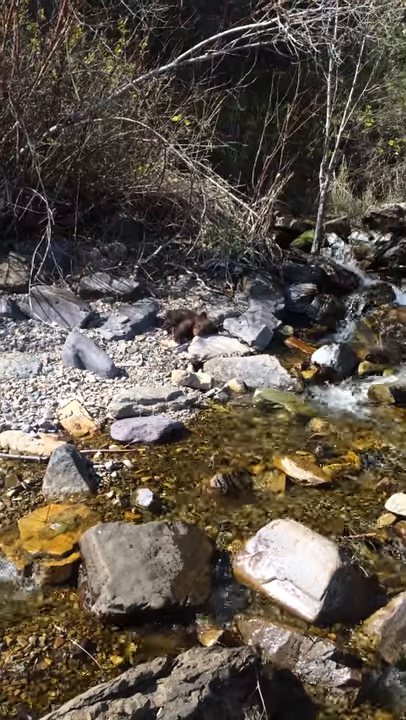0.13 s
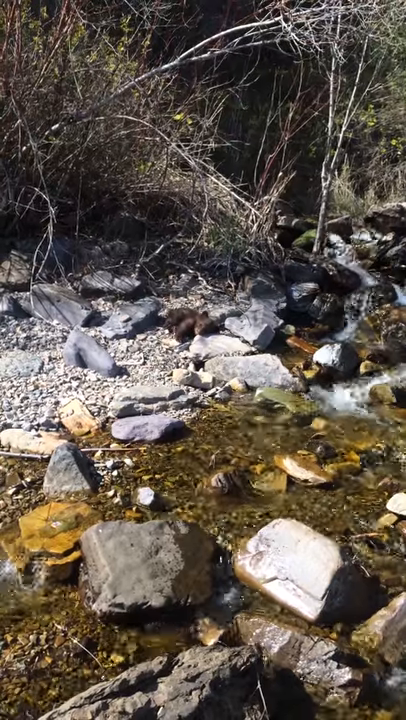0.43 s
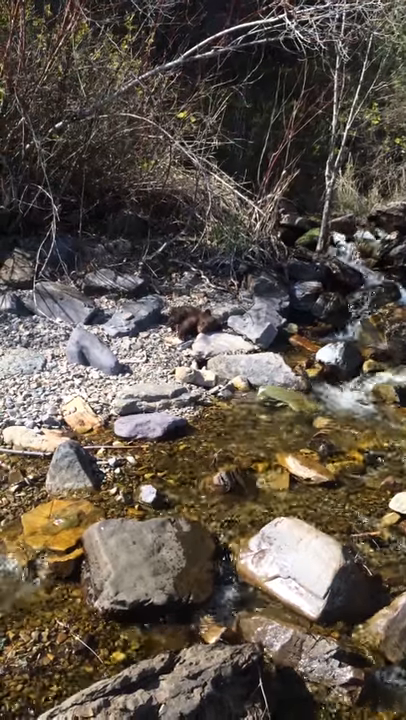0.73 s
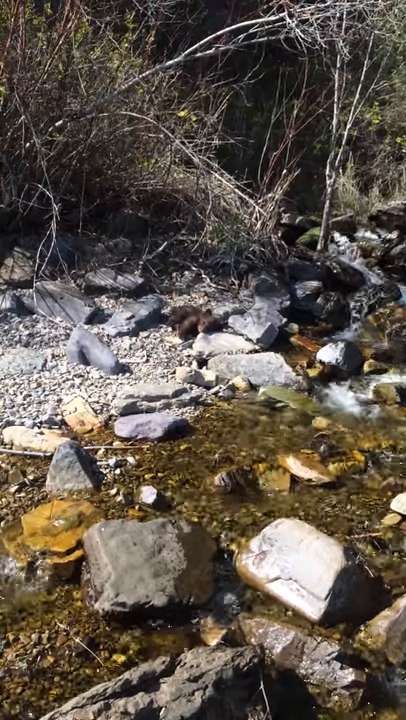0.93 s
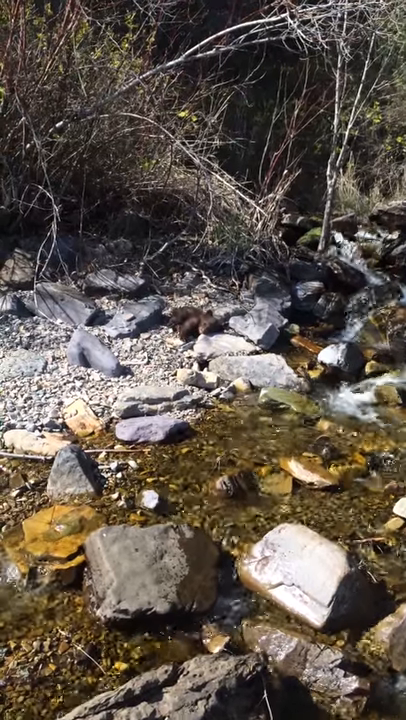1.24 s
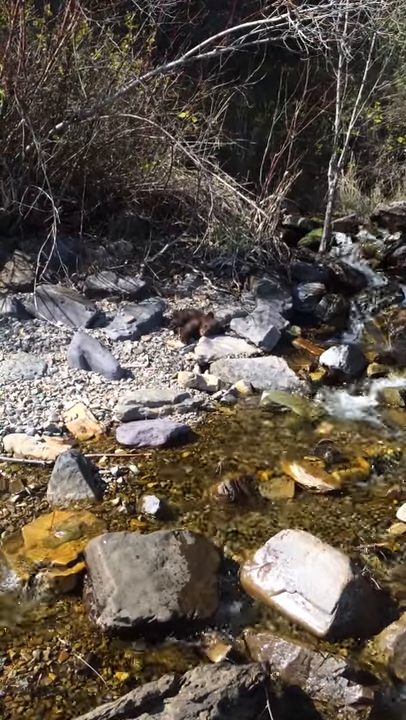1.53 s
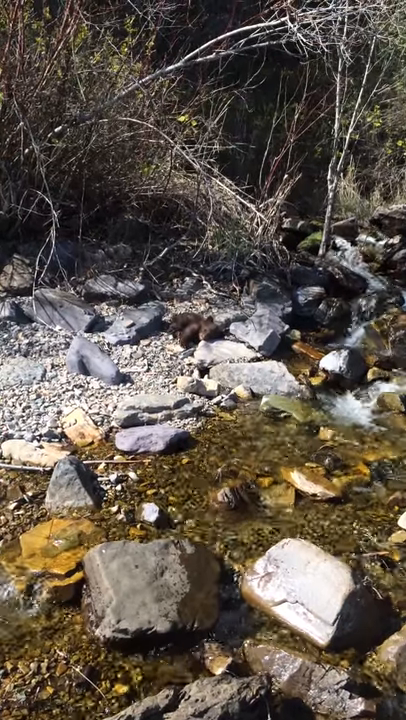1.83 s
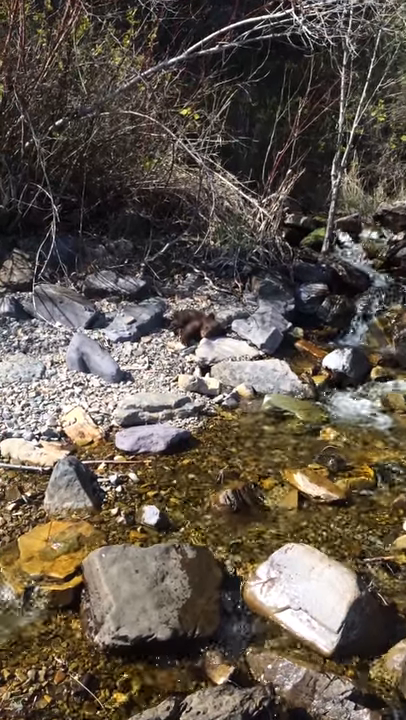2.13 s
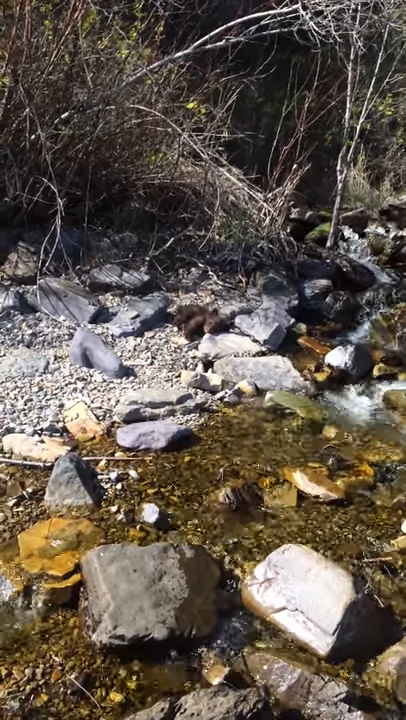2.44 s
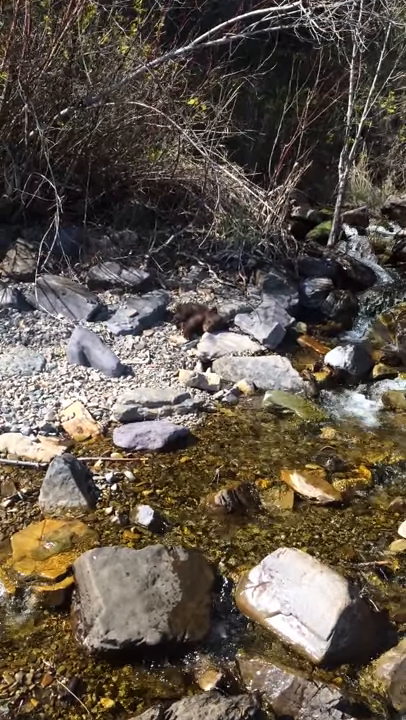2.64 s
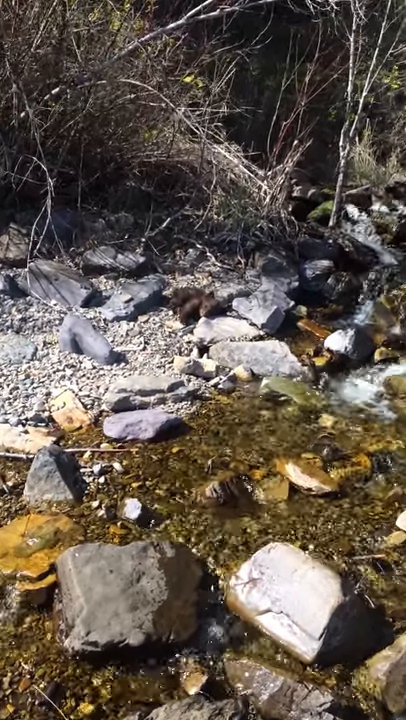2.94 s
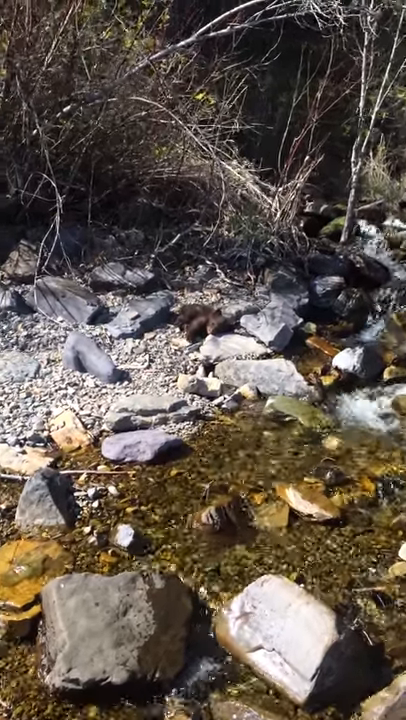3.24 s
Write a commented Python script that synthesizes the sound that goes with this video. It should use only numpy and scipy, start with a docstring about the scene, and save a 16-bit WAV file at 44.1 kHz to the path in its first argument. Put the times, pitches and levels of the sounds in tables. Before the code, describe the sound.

Water runs over stones in a shallow creek, an even wash with fine spray and low gulps. One sharp droplet ticks early, fainter ticks and plinks follow, and soft puffs of wind brush the microphone.

```python
"""After 0.12 s of silence a shallow stream rushes steadily over rocks: countless bubbles merge into a wash,
nearer ones ring singly and fine spray crackles. Throughout, air pockets gurgle and gulp under a small fall.
From 0.6 s on, close bubbles plink and droplets tick, the sharpest at 0.7 s; the loudest gulp comes at 1.6 s.
A light breeze rumbles on the microphone in puffs, strongest near 2.3 s and at the end."""
import sys
import numpy as np
from scipy import signal
from scipy.fft import rfft, irfft, next_fast_len
from scipy.io import wavfile
from scipy.ndimage import uniform_filter1d, map_coordinates

SR = 44100
rng = np.random.default_rng(int(sys.argv[2]) if len(sys.argv) > 2 else 0)


def inscribe(sig):
    """Save sig as 16-bit PCM at rate SR to the path in sys.argv[1].

    A 1-D sig is mono; a 2-D sig holds one channel per row.
    Samples are clipped to [-1, 1] before scaling.
    """
    pcm = np.round(np.clip(np.atleast_2d(sig).T, -1, 1) * 32767)
    wavfile.write(sys.argv[1], SR, pcm.astype(np.int16))


N = 148617

# envelope of the wind on the microphone: t/s, relative level/dB
BREEZE_ENVELOPE = [(0.13, -54), (0.22, -77), (0.42, -50.5), (0.52, -70), (0.78, -50), (1.12, -67.5),
                   (1.76, -55), (1.86, -44.5), (2.13, -58), (2.22, -39.5), (2.35, -39), (2.45, -59),
                   (2.51, -44), (2.67, -67), (3.0, -47), (3.04, -57), (3.1, -44.5), (3.37, -38)]
# spectrum of the wind rumble: f/Hz, relative level/dB
BREEZE_SPECTRUM = [(15, -26), (30, -20), (48, -4), (61, -2.5), (72, -0.5), (85, -7.5), (100, -1.5),
                   (130, -14), (200, -34), (400, -66)]
# loudest air pockets in the pool: t/s, peak level/dB, f/Hz
GULPS = [(0.268, -32, 190), (0.816, -35, 172), (1.613, -29.5, 177), (1.734, -36, 188), (2.701, -35, 177),
         (2.785, -38, 174)]
# filter on the spray: f/Hz, relative level/dB
SPRAY_COLOUR = [(1500, 3), (3400, -7.5), (4300, -0.5), (6000, -8.5), (9000, -16.5), (15000, -28)]
# near droplets: t/s, peak level/dB, f/Hz
DROPLETS = [(0.682, -15, 1800), (.9248, -43, 9000), (1.4573, -33, 6300), (1.4573, -28, 2690),
            (1.7878, -37, 9800), (1.9711, -47, 8300), (2.8848, -46, 8800), (3.0064, -42, 8000),
            (3.0962, -31, 5000), (3.1363, -46, 8500), (3.2338, -40, 8200), (3.2642, -47, 8800),
            (3.2687, -32, 4930)]
# single close bubbles: t/s, peak level/dB, f/Hz
PLINKS = [(.617, -30, 3430), (.635, -33, 1400), (.640, -28.5, 2230), (.676, -33, 1880), (.941, -26.5, 3510),
          (1.163, -31, 1880), (1.399, -30, 1450), (1.592, -28, 2270), (1.716, -30.5, 3430),
          (2.319, -30, 3340), (3.263, -29, 3040)]
# filter on the bubble swarm: f/Hz, relative level/dB
BUBBLE_COLOUR = [(200, -10.5), (400, -9), (720, -0.5), (1020, -1.5), (1480, 0.5), (1760, -4.5), (1950, 2.5),
                 (2300, 6), (2620, 4.5), (3100, 0), (3500, 4.5), (4100, -8), (5000, -24)]
# spectrum of the white water: f/Hz, relative level/dB
WASH_SPECTRUM = [(60, -42), (110, -11), (200, -2), (262, -3.5), (480, -4), (720, -3.5), (1000, -1.5),
                 (1490, 0.5), (1780, -1.5), (1930, 1), (2300, -3.5), (2600, 0.5), (2950, -2.5), (3410, -5),
                 (4390, -15.5), (7000, -27.5), (10000, -37), (15000, -43.5)]

GURGLE_DB, SPRAY_DB, BUBBLE_DB, WASH_DB = -46, -45, -34, -32  # rms levels at mean flow


def amp(db):
    """Amplitude grows tenfold for every 20 dB."""
    return 10 ** (np.asarray(db) / 20)


def unit(x):
    """Normalisation to rms 1."""
    return x / np.sqrt(np.mean(x ** 2) + 1e-20)


def wobble(per_s):
    """Spline interpolation joins random knots into a smooth curve."""
    return map_coordinates(rng.standard_normal(1024), [np.arange(N) * per_s / SR], mode="wrap")


def filtered(x, response):
    """Linear filtering multiplies the spectrum by a frequency response."""
    size = next_fast_len(N + SR // 2)
    return irfft(rfft(x, size) * response(np.fft.rfftfreq(size, 1 / SR)), size)[:N]


def coloured(x, points):
    """Spectral shaping by (f/Hz, level/dB) points on a log frequency axis, at rms 1."""
    f, db = np.transpose(points)
    return unit(filtered(x, lambda hz: amp(np.interp(np.log(hz + 1), np.log(f + 1), db))))


def rings(onset_s, db, hz, cycles, swell, rise):
    """Damped oscillators decay 60 dB over a life of `cycles`; swell is a share of life, rise of pitch."""
    life_s = (cycles / hz)[:, None]
    t = np.arange(min(int(life_s.max() * SR), SR // 4)) / SR
    age = t / life_s
    envelope = (1 - np.exp(-(age / swell) ** 2)) * np.exp(-np.log(1000) * age)
    envelope /= envelope.max(axis=1, keepdims=True)
    phase = 2 * np.pi * hz[:, None] * t * (1 + rise * age / 2)
    waves = amp(db)[:, None] * envelope * np.sin(phase)
    samples = (onset_s * SR).astype(int)[:, None] + np.arange(len(t))
    return np.bincount(samples.ravel(), waves.ravel(), N)[:N]


def swarm(per_s, low_hz, high_hz, cycles, swell, rise, spread_db, groups):
    """Superposition of bubbles of random onset, pitch, strength and damping, at rms 1."""
    when, pitch, strength, duration = rng.random((2 ** 15, 4))[:int(per_s * N / SR)].T
    hz = (np.sqrt(low_hz) + pitch * (np.sqrt(high_hz) - np.sqrt(low_hz))) ** 2
    db = -spread_db * np.log(strength + np.exp(-6))  # many weak, few strong
    life = cycles * 2 ** (duration - 0.5)
    like_pitched = np.array_split(np.argsort(hz), groups)
    return unit(sum(rings(when[g] * N / SR, db[g], hz[g], life[g], swell, rise) for g in like_pitched))


def breeze(gain_db=1):
    """Turbulent pressure on the microphone rumbles with each puff of air."""
    level_db = np.interp(np.arange(N) / SR, *np.transpose(BREEZE_ENVELOPE))
    return amp(level_db + gain_db) * coloured(rng.standard_normal(N), BREEZE_SPECTRUM)


def pool():
    """Resonant frequency falls with size: large air pockets under the fall gurgle and gulp low."""
    gurgle = swarm(per_s=90, low_hz=137.7, high_hz=204, cycles=12.2,
                   swell=0.3, rise=0.16, spread_db=1, groups=2)
    gulps = rings(*np.transpose(GULPS), cycles=11.8, swell=0.13, rise=0.19)
    return amp(GURGLE_DB) * gurgle + gulps


def spray():
    """Impacts of tiny drops on the surface excite heavily damped rings, heard as crackle."""
    crackle = swarm(per_s=980, low_hz=1490, high_hz=14200, cycles=9,
                    swell=0.097, rise=0.05, spread_db=1.5, groups=4)
    return amp(SPRAY_DB) * coloured(crackle, SPRAY_COLOUR)


def droplets(cutoff_hz=11500):
    """Impulse excitation: each near droplet ticks and throws a weaker, higher satellite drop."""
    onset_s, db, hz = np.transpose(DROPLETS)
    ticks = rings(onset_s, db, hz, cycles=15, swell=0.13, rise=0)
    satellites = rings(onset_s + 0.00031, db - 8, hz * 1.73, cycles=12, swell=0.13, rise=0)
    return filtered(ticks + satellites, lambda f: 1 / np.sqrt(1 + (f / cutoff_hz) ** 20))


def plinks():
    """Light damping lets single bubbles near the bank ring out above the rush."""
    return rings(*np.transpose(PLINKS), cycles=150, swell=0.06, rise=0.03)


def bubbles():
    """Bubble resonance: air trapped between the rocks is a spring, the water around it a mass."""
    ringing = swarm(per_s=3000, low_hz=298.9, high_hz=4305, cycles=34,
                    swell=0.06, rise=0.085, spread_db=2.5, groups=12)
    return amp(BUBBLE_DB) * coloured(ringing, BUBBLE_COLOUR)


def wash(patch_db=0.66):
    """Incoherent summation: countless far bubbles in white water merge into patchy noise."""
    spectrogram = signal.stft(rng.standard_normal(N), nperseg=512)[2]
    patches = uniform_filter1d(rng.standard_normal(spectrogram.shape), size=6, axis=0)  # over frequency
    patches = uniform_filter1d(patches, size=8, axis=1)  # over time
    rush = signal.istft(spectrogram * amp(patch_db * unit(patches)), nperseg=512)[1][:N]
    return amp(WASH_DB) * coloured(rush, WASH_SPECTRUM)


def scene(surge_db=0.1):
    """Common modulation: one slightly uneven flow drives wash, bubbles and spray; the rest add on."""
    flow = amp(surge_db * wobble(per_s=4.97))
    stream = flow * (wash() + bubbles() + spray())
    return (breeze() + pool() + droplets() + plinks() + stream)[None]


def record(dry, start_s=0.12, top_hz=15300):
    """Gating and band limiting: the sound enters over 1 ms, and nothing passes above top_hz."""
    gate = np.clip((np.arange(N) / SR - start_s) * 1000, 0, 1)
    return filtered(dry[0] * gate, lambda hz: hz < top_hz)[None]


dry = scene()
out = record(dry)
inscribe(out)
```